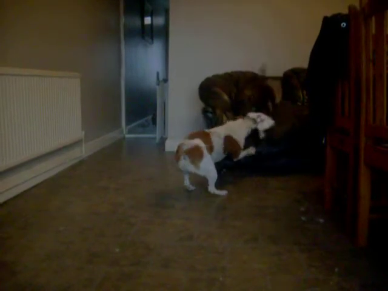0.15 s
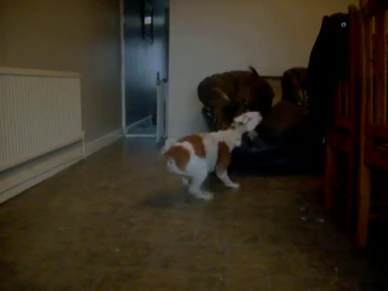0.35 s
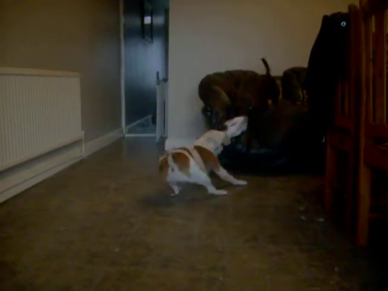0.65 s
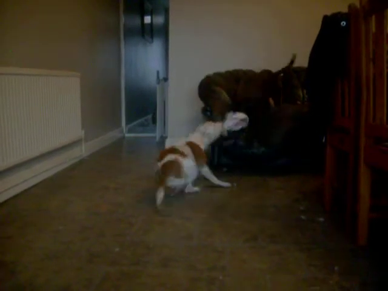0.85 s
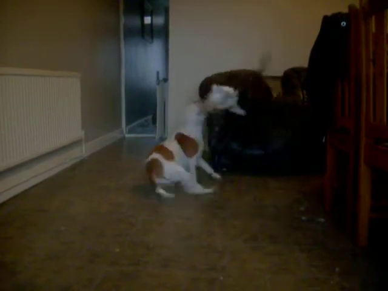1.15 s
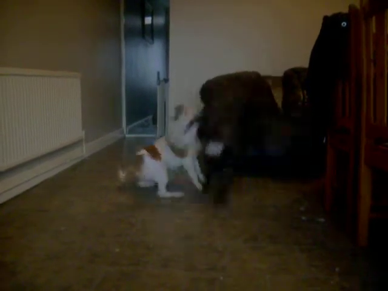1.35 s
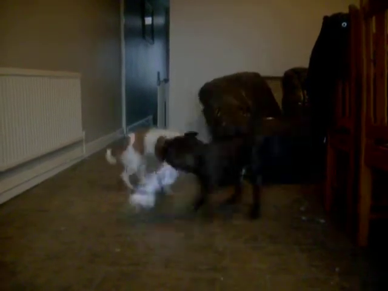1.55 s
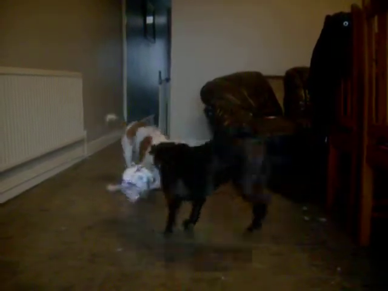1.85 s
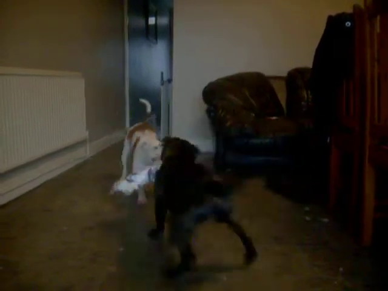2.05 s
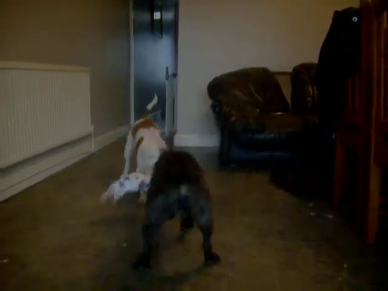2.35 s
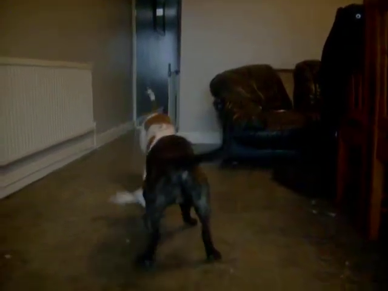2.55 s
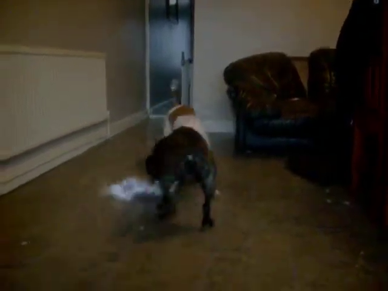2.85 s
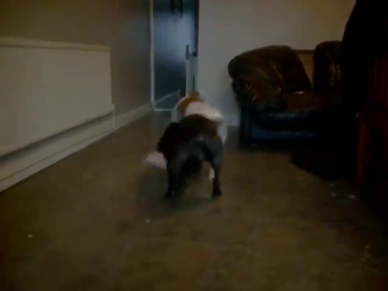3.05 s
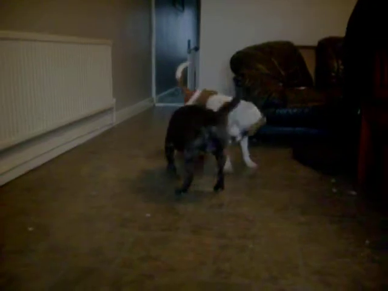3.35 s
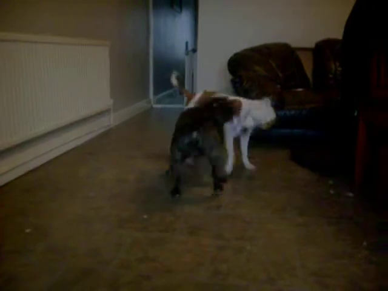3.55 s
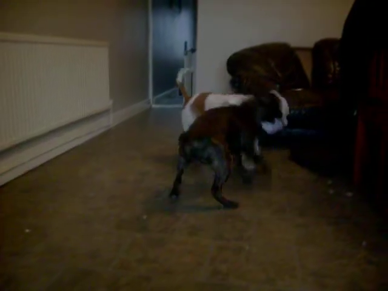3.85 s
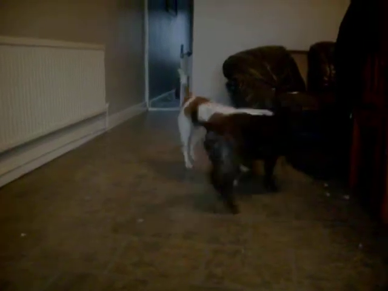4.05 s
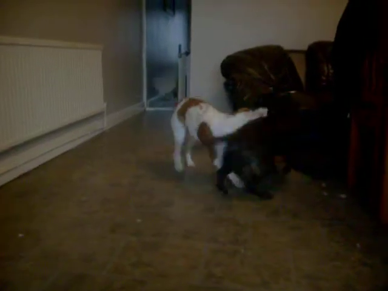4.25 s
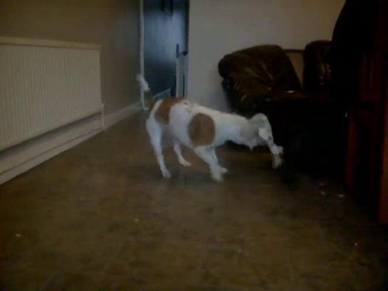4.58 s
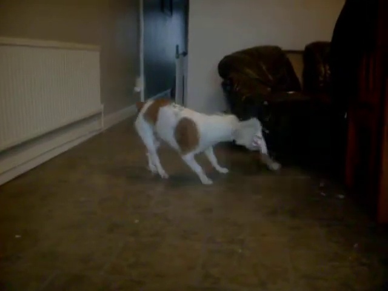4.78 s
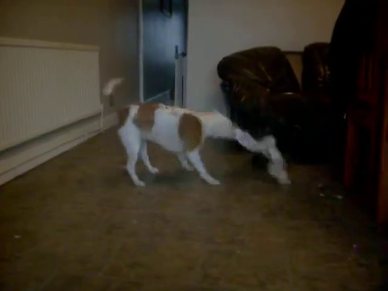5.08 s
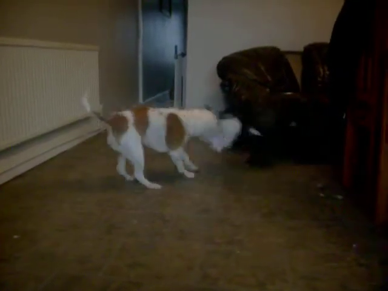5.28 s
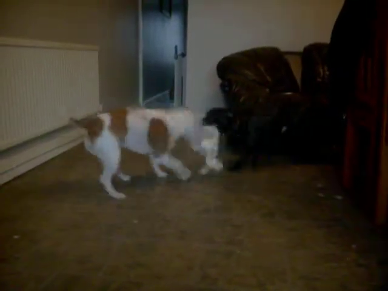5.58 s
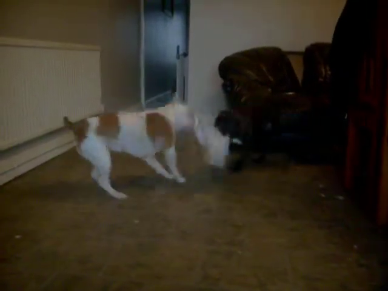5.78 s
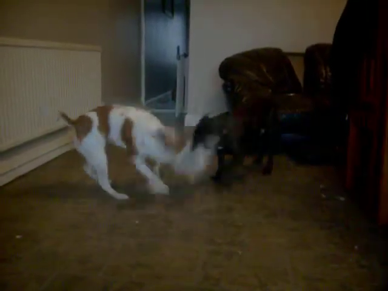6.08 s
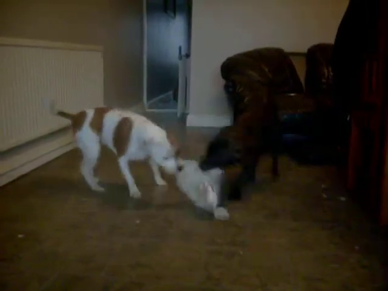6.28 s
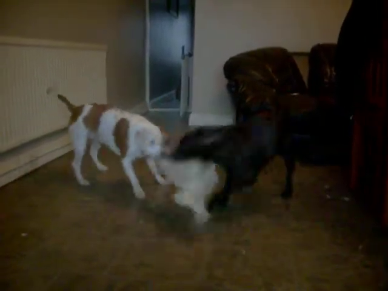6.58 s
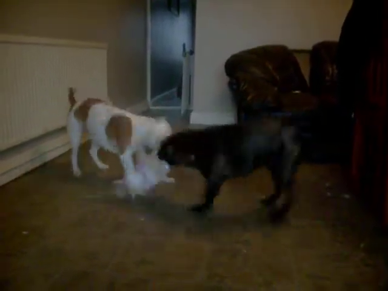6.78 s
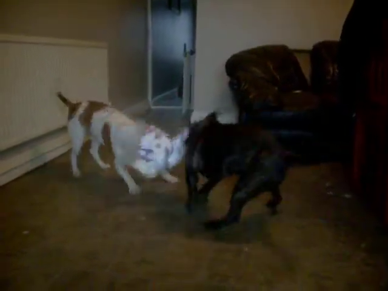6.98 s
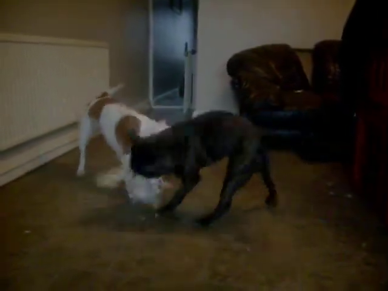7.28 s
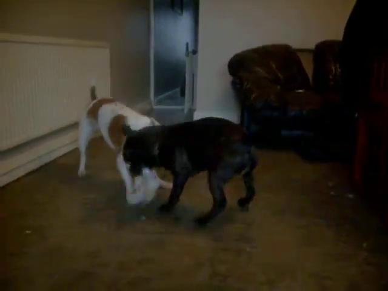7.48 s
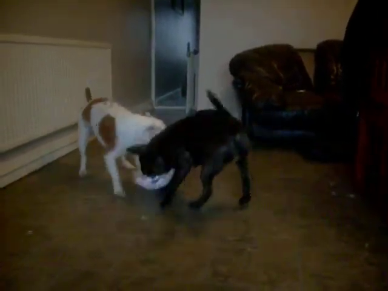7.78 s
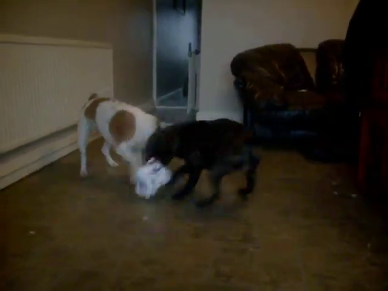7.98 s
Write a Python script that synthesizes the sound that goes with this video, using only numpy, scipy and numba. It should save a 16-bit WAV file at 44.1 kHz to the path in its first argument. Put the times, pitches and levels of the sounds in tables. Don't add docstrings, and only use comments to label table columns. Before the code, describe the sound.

Two dogs tussle over a cloth toy indoors: throaty broken growling, breathy snarls, scrabbling paws and sharp claw ticks ringing off bare walls.

```python
import sys
import numpy as np
from scipy import signal
from scipy.fft import rfft, irfft
from scipy.io import wavfile
from scipy.ndimage import uniform_filter1d
from numba import njit

SR = 44100
rng = np.random.default_rng(int(sys.argv[2]) if len(sys.argv) > 2 else 0)


def ratio(d):
    e = np.asarray(d, float) / 20
    return 10 ** e


def to_wav(sig):
    pcm = np.clip(np.atleast_2d(sig), -1, 1) * 32767
    pcm = np.round(pcm).astype(np.int16)
    wavfile.write(sys.argv[1], SR, pcm.T)


N = 358533
TAILS = 4


def shape(points, size):
    hz, db = np.transpose(points)
    return ratio(np.interp(np.log(np.fft.rfftfreq(size, 1 / SR) + 1), np.log(hz), db))


# frequency in Hz, gain in dB.
MIC_RESPONSE = [(30, -41), (60, 0.5), (90, 11.5), (1000, 2), (2250, 5.5), (2650, 10.5), (2950, 14),
                (3400, 8.5), (3750, 5), (5000, -1.5), (7000, -14.5), (9500, -17), (11000, -26),
                (12300, -53.5)]


def microphone_gain(size):
    return shape(MIC_RESPONSE, size)


def heard(x, lo_hz, hi_hz):
    hz = np.fft.rfftfreq(len(x), 1 / SR)
    power = np.abs(rfft(x) * microphone_gain(len(x))) ** 2
    inside = (hz > lo_hz) & (hz < hi_hz)
    return x * len(x) / np.sqrt(2 * power[inside].sum())


@njit
def svf(x, hz, width, sr):
    y, band_state, low_state = np.empty(len(x)), 0., 0.
    for i in range(len(x)):
        g, k = np.tan(np.pi * hz[i] / sr), width / hz[i]
        v = (band_state + g * (x[i] - low_state)) / (1 + g * (g + k))
        band_state = 2 * v - band_state
        low_state = low_state + 2 * g * v
        y[i] = k * v
    return y


def band(x, hz, width):
    return svf(x, hz + np.zeros(len(x)), 1. * width, 1. * SR)


def highs(x, hz):
    return signal.sosfilt(signal.butter(3, hz, "high", fs=SR, output="sos"), x)


def walk(rate):
    hold = int(SR / rate)
    levels = np.repeat(rng.standard_normal(N // hold + 1), hold)
    return 1.3 * uniform_filter1d(uniform_filter1d(levels, hold), hold)[:N]


def bursts(table, rise_db_s, fall_db_s, lead_s=0.):
    start, hold, db, trait = np.transpose(table)[:, :, None]
    t = np.arange(0, N + 64, 64) / SR
    late = t + lead_s - start
    rise = rise_db_s * np.minimum(late, 0)
    fall = fall_db_s * np.maximum(late - hold, 0)
    power = ratio(2 * np.maximum(db + rise - fall, -300))
    total = power.sum(0)
    both = 10 * np.log10(total), (power * trait).sum(0) / total
    return [np.interp(np.arange(N) / SR, t, c) for c in both]


# frequency in Hz, density in dB per Hz.
HOUSE_AIR = [(15, -68.5), (25, -21.5), (148, -30), (291, -18.5), (439, -25), (2230, -9), (2970, -8.5),
             (6280, -39.5), (9990, -39.5), (12000, -55), (15600, -85), (22000, -120)]


def air():
    gain = shape(HOUSE_AIR, N) / microphone_gain(N)
    x = irfft(rfft(rng.standard_normal(N)) * gain, N)
    return ratio(-50) * heard(x, 25, 12000)


# frequency in Hz, time to fall 60 dB in seconds.
ROOM_DECAY = [(100, 0.55), (500, 0.57), (1500, 0.53), (3000, 0.41), (6000, 0.46), (11000, 0.12)]


def room():
    t = np.arange(SR) / SR
    hz, t60 = np.transpose(ROOM_DECAY)
    tail = 0
    for f in 60 * 2 ** np.arange(0, 8, .5):
        fade = np.exp(-np.log(1000) * t / np.interp(np.log(f), np.log(hz), t60))
        noise = rng.standard_normal(SR)
        tail = tail + fade * band(band(noise, f, f / 2), f, f / 2)
    flutter_s = .01664
    flutter_db = 3.2 * np.cos(2 * np.pi * (t - .002) / flutter_s) * np.exp(-t / .1)
    clumps_db = 3 * walk(200)[:SR] * np.exp(-t / .08)
    tail = tail * ratio(flutter_db + clumps_db) * (1 - np.exp(-t / .003))
    return tail / np.sqrt(np.sum(tail ** 2))


# start in seconds, hold in seconds,
# level of dull slips in dB, sharp slips in dB above the dull ones.
FLOOR_DRAGS = [(0, 0.0086, -51.5, -3.5), (.28, .16, -43, -10.5), (.5, 0.22, -43.5, -15.5),
               (.73, 0.13, -43, -10), (1.1, 0.064, -41, -9.5), (1.33, 0.17, -35, -15),
               (1.66, 0.4, -43.5, -10), (1.99, 0.1, -38.5, -10.5), (2.26, 0.047, -36.5, -14.5),
               (2.68, 0.06, -49, -14), (2.81, 0.042, -40.5, -11), (2.95, 0.18, -49.5, -5),
               (3.15, 0.13, -38.5, -13), (3.35, 0.028, -53, -6), (3.8, 0.035, -50, -7),
               (3.91, 0.05, -48, -10), (4.1, 0.12, -37.5, -12.5), (4.26, 0.053, -36.5, -17),
               (4.45, 0.23, -38.5, -11.5), (4.8, 0.4, -42.5, -10), (5.25, 0.017, -44, -16),
               (5.63, 0.056, -37.5, -13.5), (5.85, .15, -48.5, -7.5), (6.13, 0.044, -36.5, -5),
               (6.48, 0.16, -43, -32), (6.75, 0.02, -38.5, -38), (6.84, 0.44, -42.5, -9.5),
               (7.2, 0.5, -47, -14), (7.82, 0.04, -46, -10), (8.0, .06, -41, -13)]


def scuff():
    dull_db, sharp_db = bursts(FLOOR_DRAGS, rise_db_s=172.5, fall_db_s=103)
    struck = rng.random(N) < 9000 / SR
    slips = struck * ratio(2.2 * rng.exponential(size=N)) * rng.standard_normal(N)
    slips = slips * ratio(2.2 * walk(30))
    dull = band(band(slips, 2870, 2200), 2870, 2200)
    sharp = band(highs(slips, 4710), 7440, 4200)
    return ratio(dull_db - 4.5) * heard(dull, 2590, 3280) + ratio(dull_db + sharp_db - 12.0) * heard(sharp, 3500, 13000)


# time in seconds, peak in dB, brightness in dB, room share in dB.
CLAW_STEPS = [(0.1135, -41, -32, 7), (0.2847, -20.5, -16, 9.5), (0.295, -19, -28, -6),
              (1.0691, -43.5, -4.5, 8.5), (1.6474, -17.5, -14.5, -3.5), (1.819, -24.5, -19, 1),
              (1.9847, -16.5, -13, 1.5), (2.238, -23.5, -19.5, 2.5), (2.2907, -13, -24, -6),
              (2.8937, -34.5, -14, 10), (3.1398, -12.5, -24, -1.5), (3.1684, -34, -36, -3),
              (3.7471, -14, -17, 0.5), (4.2482, -23, -19, 8), (4.4721, -14.5, -24, 0.5),
              (4.579, -34, -30, 8), (5.0208, -18.5, -15.5, 0), (5.4877, -29, -18, 5.5),
              (5.7305, -20, -25, -4.5), (5.7657, -33.5, -14.5, 11.5), (5.913, -21, -22, -4.5),
              (5.9658, -10.5, -29, -9), (6.4399, -18.5, -17, 0.5), (6.6853, -17, -16.5, 0),
              (6.8931, -34, -33, 5), (6.9152, -33, -17, 12), (7.417, -13.5, -21, 0.5),
              (7.8607, -25, -24, -11), (7.923, -25, -11, 3), (7.9714, -18.5, -22, -3.5)]
PAW_STEPS = [(.164, -36, -25, 9.5), (.6422, -36, -33, 10), (.7378, -23.5, -31, 7), (0.8078, -29, -15, -3),
             (0.8453, -34.5, -30, 14), (1.2155, -22.5, -31, 0), (1.3151, -25.5, -31, -2),
             (1.3956, -21.5, -11.5, 2), (1.5072, -23.5, -13, -5), (1.5304, -22.5, -13.5, 2),
             (1.6899, -21, -21, -1.5), (1.8663, -25.5, -22, 6.5), (2.632, -22, -25, -1),
             (2.788, -22.5, -21, 2.5), (2.9257, -31, -7.5, 9.5), (3.274, -30, -20, 7.5),
             (3.8675, -27.5, -10, 2), (3.9337, -34, -21, 2.5), (3.9755, -30, -13, 3.5),
             (4.0802, -22, -19.5, -3), (4.6748, -17.5, -20, 1.5), (5.4555, -25, -18.5, 3.5),
             (5.6214, -21, -13.5, -1), (6.6478, -32.5, -36, 6), (7.057, -27.5, -27, 2.5),
             (7.1696, -8.5, -21.5, 2), (7.666, -27, -21, 4), (7.7057, -33, -16, 1),
             (7.815, -33, -16.5, 10.5)]


def claws():
    size = 1024
    direct, sends = np.zeros(N + size), np.zeros((TAILS, N + size))
    t = np.arange(size) / SR
    steps = sorted([(*row, -19) for row in CLAW_STEPS] + [(*row, -5) for row in PAW_STEPS])
    chance = rng.standard_normal((len(steps), 2, size))
    for k, ((s, db, bright_db, room_db, pad_db), (grit, slip)) in enumerate(zip(steps, chance)):
        tick = 1. * (t == 0)
        bounce = np.roll(tick, int(.0035 * SR))
        scrape = .25 * np.exp(-t / .001) + .6 * (slip > 2.1) * np.exp(-t / .005)
        skid = .85 * tick + .5 * bounce + grit * scrape
        pad = ratio(pad_db + 17.0) * band(band(tick, 1500, 1200), 1500, 1200)
        edge_db = bright_db + 22
        i = int(s * SR)
        near = band(highs(skid, 1500), 4420, 2900) + ratio(edge_db) * highs(skid, 2870) + pad
        direct[i:i + size] += ratio(db + 1.5) * near
        far_edge = ratio(edge_db - 8) * highs(tick, 5920)
        far = band(band(tick, 2890, 2400), 2890, 2400) + far_edge + ratio(-17.0) * pad
        sends[k % TAILS, i:i + size] += ratio(db + room_db + 15.0) * far
    return direct[:N], sends[:, :N]


# time in seconds, share of breath noise from 0 to 1.
ROUGHNESS = [(0, .7), (2.6, .7), (2.75, .4), (3.2, .4), (3.3, .55), (3.9, .4), (4.0, .2), (4.4, .25),
             (4.6, .5), (6.5, .55), (8.13, .5)]


def vocal_folds(chest_db):
    s, share = np.transpose(ROUGHNESS)
    rough = np.interp(np.arange(N) / SR, s, share)
    hz = 70.25 - .02 * (chest_db + 55.5)
    turns = np.cumsum(hz * (1 + .16 * rough * walk(70))) / SR
    size = ratio(4.2 * rough * rng.standard_normal(N // 100)[turns.astype(int)])
    slaps = np.diff(np.floor(turns), prepend=0) * size
    puffs = size * np.exp(-(turns % 1) / .4) * rng.standard_normal(N)
    return slaps / slaps.std(), puffs / puffs.std(), rough


# frequency in Hz, width in Hz, level in dB.
CHEST_MODES = [(125, 16, -12.5), (214.3, 53, -7), (290, 28, -5)]


def chest_voice(folds, rough):
    chest = 0
    for k, (f, width, db) in enumerate(CHEST_MODES):
        chest = chest + (-1) ** k * ratio(db) * band(band(folds, f, width * 2), f, width)
    return chest + rough ** 2 * ratio(5.5) * band(band(folds, 524, 240), 390, 100)


# frequency in Hz, width in Hz, level in dB.
THROAT_CAVITIES = [(582, 163, -4), (625, 108, -4.5), (832, 174, -1), (1126, 178, -6)]


def throat_voice(folds):
    jaw = 1 + .025 * walk(5)
    throat = 0
    for k, (f, width, db) in enumerate(THROAT_CAVITIES):
        ring = band(band(folds, f * jaw, width * 2), f * jaw, width)
        throat = throat + (-1) ** k * ratio(db + 2.04 * walk(6)) * ring
    return throat


# start in seconds, hold in seconds, level in dB,
# mouth resonance in Hz.
TEETH_SNARLS = [(0, 0.012, -38.5, 1320), (.16, 0.013, -31.5, 1650), (.29, 0.014, -42, 2160),
                (.52, 0.06, -38.5, 1430), (.65, 0.036, -34, 1930), (.73, 0.098, -32, 1800),
                (1.18, 0.012, -43, 2070), (1.325, 0.21, -37.5, 1445), (1.87, 0.025, -35, 1765),
                (2.31, 0.0041, -45, 1890), (2.44, 0.01, -43, 1600), (2.67, 0.0081, -46.5, 2020),
                (2.76, 0.24, -46, 1600), (3.0, 0.16, -47, 1400), (3.26, 0.17, -33, 1165),
                (3.87, 0.0089, -47.5, 1710), (4.05, 0.16, -41, 1560), (4.25, 0.01, -32.5, 1790),
                (4.48, 0.0064, -45, 1920), (4.68, 0.009, -36, 1800), (4.8, .3, -43, 1425),
                (5.17, 0.057, -39, 1700), (5.6, 0.099, -37.5, 1676), (5.98, .01, -42, 2090),
                (6.13, 0.054, -34.5, 1970), (6.67, 0.1, -43.5, 1380), (6.96, 0.05, -38, 1770),
                (7.18, .02, -42, 1760), (7.83, 0.035, -42.5, 1920), (8.03, 0.025, -41.5, 1400)]


def snarl(slaps, puffs):
    mouth_db, mouth_hz = bursts(TEETH_SNARLS, rise_db_s=421, fall_db_s=164)
    mouth_hz = mouth_hz * (1 + .03 * walk(12))
    breath = (.25 * slaps + puffs) * ratio(2.3 * walk(35))
    gap = band(band(breath, mouth_hz, 500), mouth_hz, 240)
    hiss = band(band(breath, 1600, 2000), 1600, 1400)
    return ratio(mouth_db - 2.5) * heard(gap + ratio(-1.5) * hiss, 810, 2420)


# start in seconds, hold in seconds, chest level in dB,
# throat level in dB above the chest.
CLENCHED_GROWLS = [(0, .18, -52, 9.5), (.52, .12, -50.5, 15.5), (.72, 0.13, -53, 5.5),
                   (1.02, 0.31, -58.5, 3), (1.32, 0.2, -55, 10.5), (1.89, 0.024, -52.5, 7.5),
                   (2.71, .17, -46, 6), (2.92, 0.23, -52, 14.5), (3.26, 0.064, -42, 14.5),
                   (3.39, .05, -50, 3), (4.0, .12, -46, -0.5), (4.16, 0.1, -49.5, 4), (4.41, .05, -67, 4),
                   (4.64, 0.035, -53.5, 6.5), (4.77, .08, -49.5, 4.5), (4.93, 0.12, -56.5, 4.5),
                   (5.17, .08, -63, 16.5), (5.69, .03, -55, 12.5), (5.86, 0.15, -68, 8.5),
                   (6.13, .06, -49.5, 7.5), (6.44, 0.023, -65.5, 8), (6.6, 0.042, -60, 10),
                   (6.66, .07, -47, 8), (6.8, 0.083, -58, 6.5), (6.93, 0.08, -45, 4.5), (7.1, .12, -59, 10),
                   (7.6, 0.079, -57, 3.5), (7.71, 0.054, -51.5, 9.5), (7.82, 0.16, -54, 10.5),
                   (8.0, .13, -48.5, 6.5)]


def growl():
    rise, fall = 450, 120
    chest_db, throat_db = bursts(CLENCHED_GROWLS, rise, fall)
    deep_db = bursts(CLENCHED_GROWLS, rise, fall, lead_s=.022)[0] - 12
    slaps, puffs, rough = vocal_folds(chest_db)
    folds = np.sqrt(1 - rough) * slaps + np.sqrt(rough) * puffs
    deep = band(band(folds, 103, 84), 78.6, 51)
    voice = ratio(chest_db - 6.0) * heard(chest_voice(folds, rough), 110, 320)
    voice = voice + ratio(deep_db) * heard(deep, 55, 130)
    voice = voice + ratio(chest_db + throat_db - 3.5) * heard(throat_voice(folds), 450, 1014)
    return voice + snarl(slaps, puffs)


def scene():
    voice, drag, (ticks, sends) = growl(), scuff(), claws()
    tail_mix = ratio(6 * np.array([walk(2.5) for _ in range(TAILS)]))
    tail_mix = tail_mix / np.sqrt(np.sum(tail_mix ** 2, axis=0))
    sends = sends + tail_mix * (ratio(-5.5) * voice + ratio(-3) * drag)
    wet = sum(signal.fftconvolve(x, room())[:N] for x in sends)
    return (ratio(-2.0) * voice + ratio(0.5) * drag + ticks + wet + air())[None]


def top_cut(x):
    return signal.sosfilt(signal.butter(12, 12120, fs=SR, output="sos"), x)


def record(dry):
    size = 4096
    cepstrum = irfft(np.log(microphone_gain(size)), size)
    cepstrum[1:size // 2] *= 2
    cepstrum[size // 2 + 1:] = 0
    taps = irfft(np.exp(rfft(cepstrum)), size)
    mix = signal.fftconvolve(dry, taps[None])[:, :N]
    return top_cut(mix)


dry = scene()
out = record(dry)
to_wav(out)
```